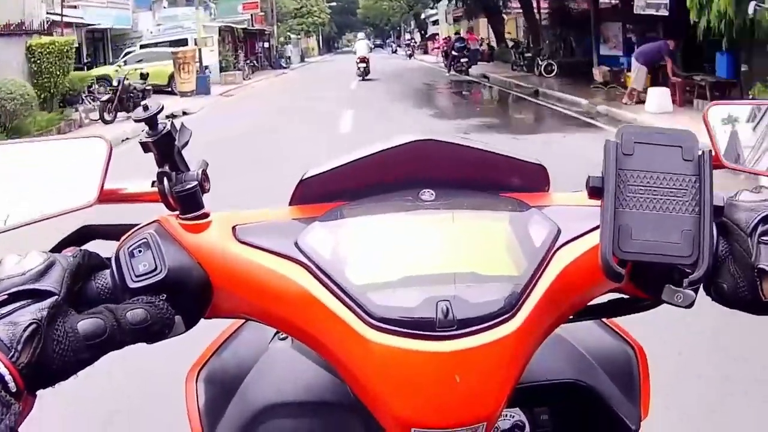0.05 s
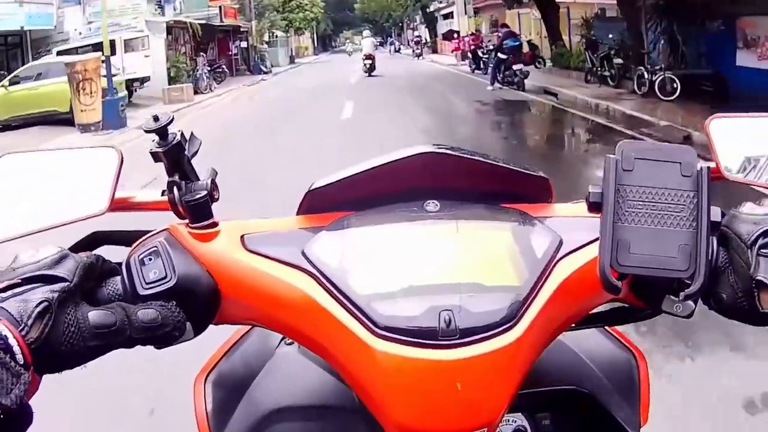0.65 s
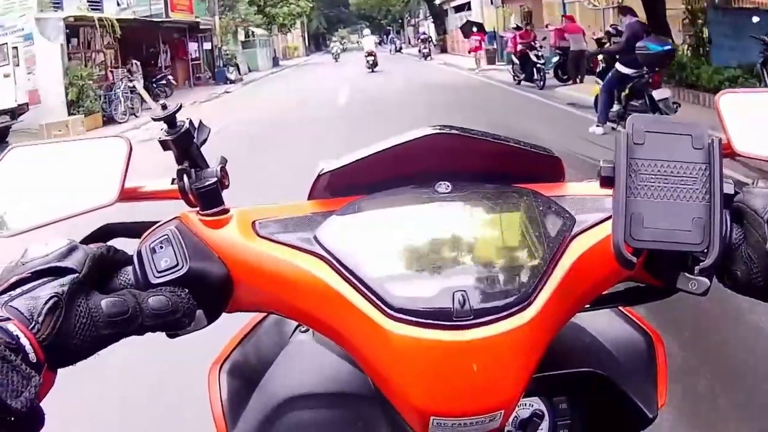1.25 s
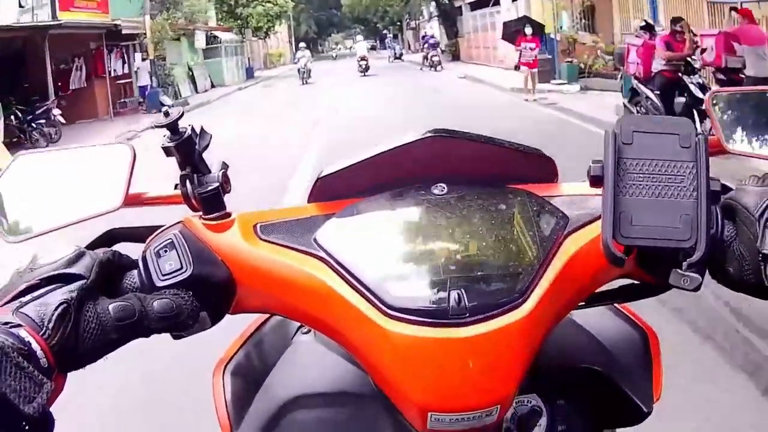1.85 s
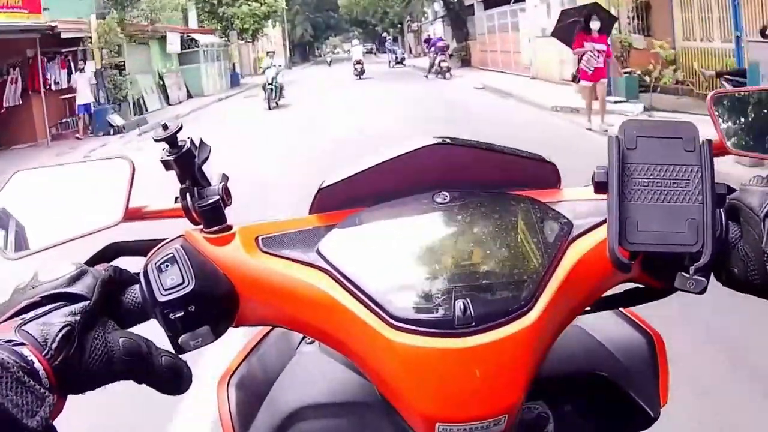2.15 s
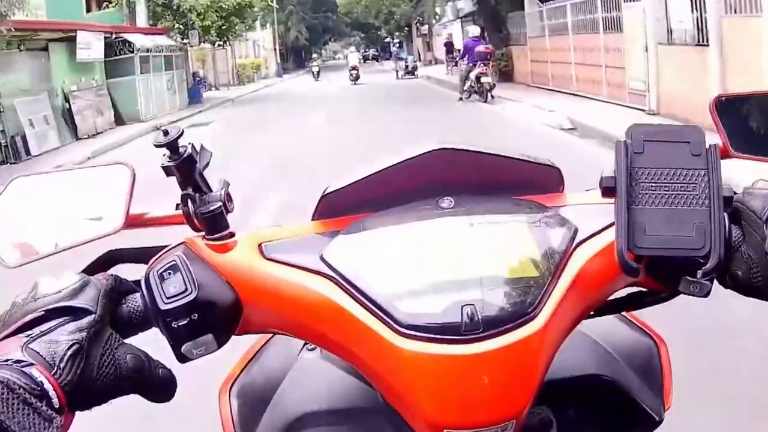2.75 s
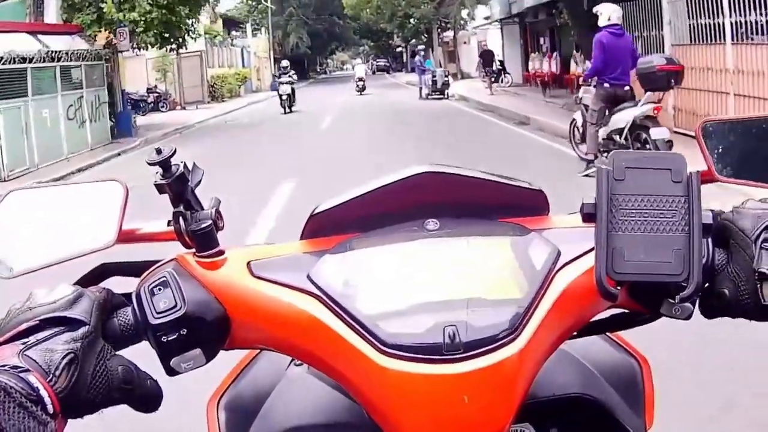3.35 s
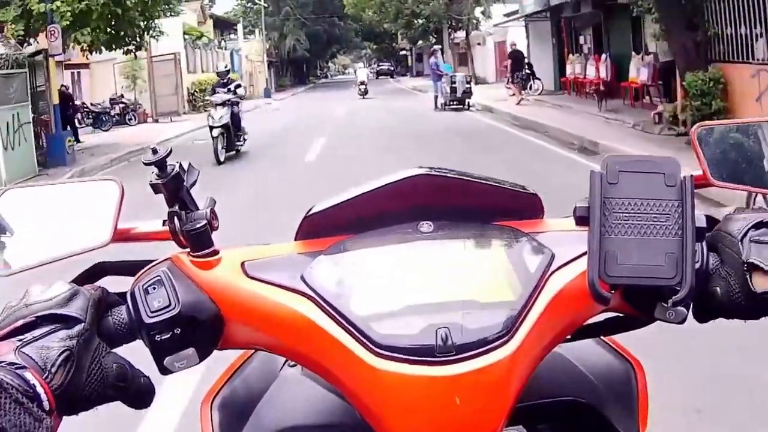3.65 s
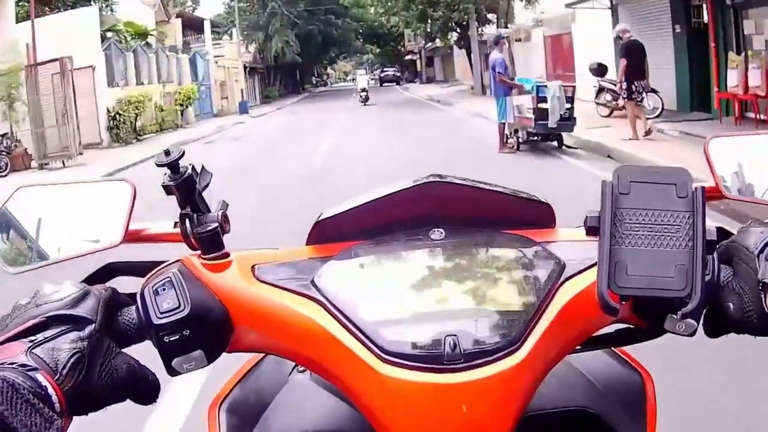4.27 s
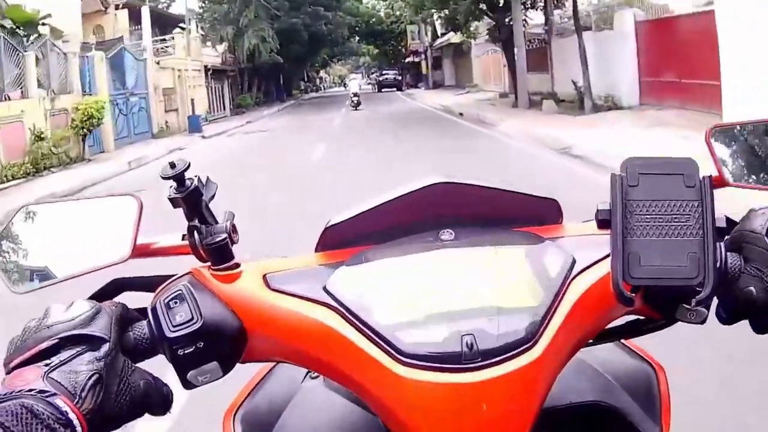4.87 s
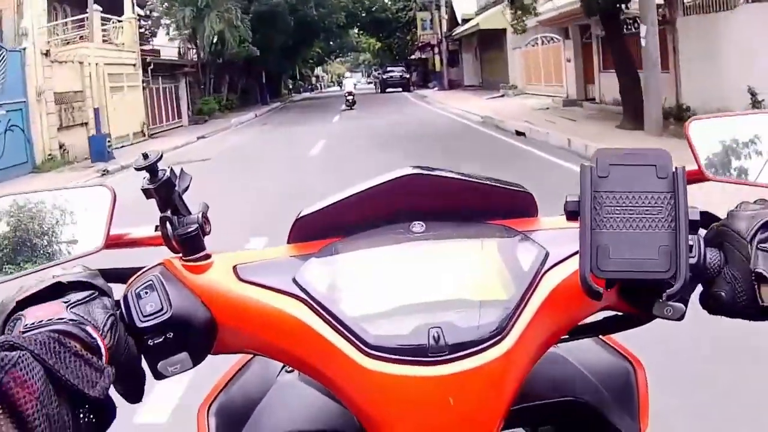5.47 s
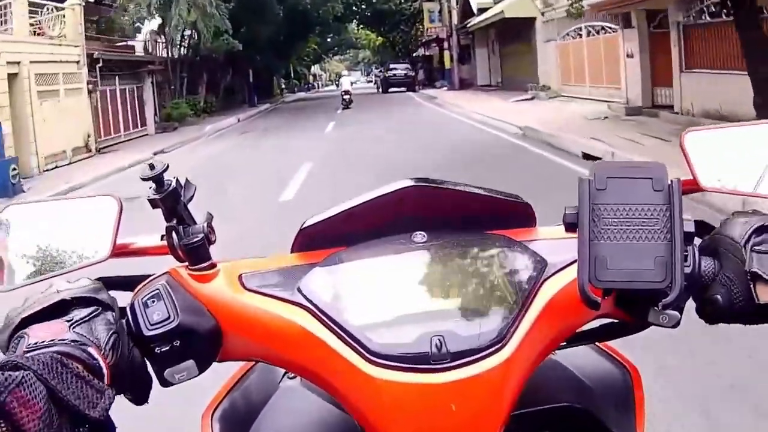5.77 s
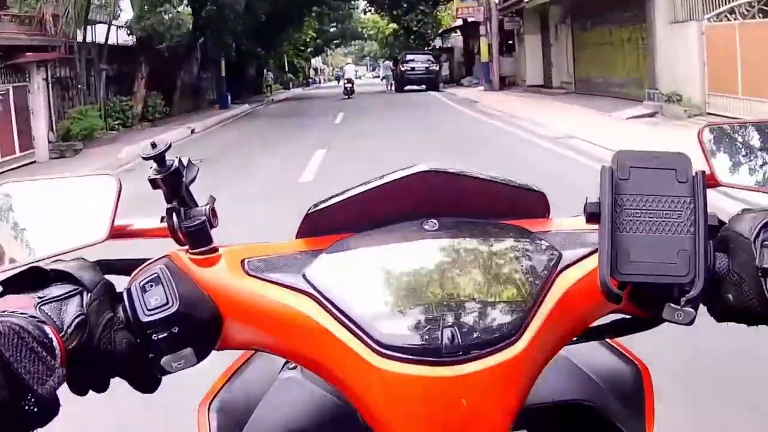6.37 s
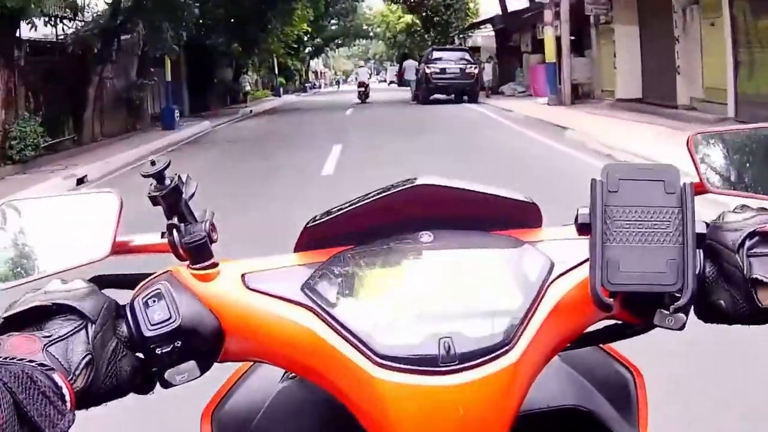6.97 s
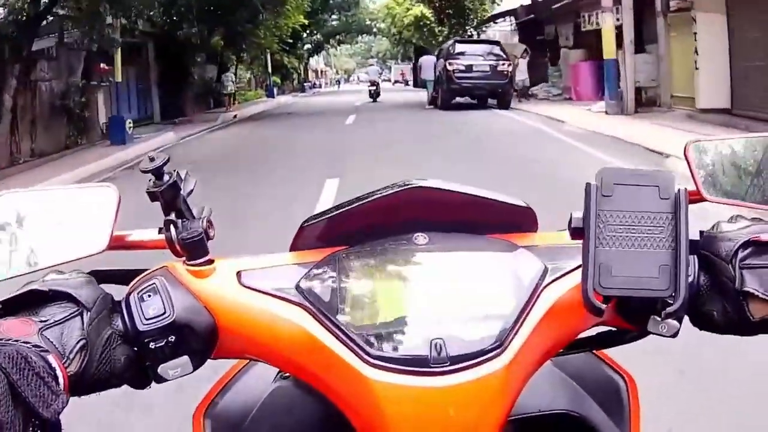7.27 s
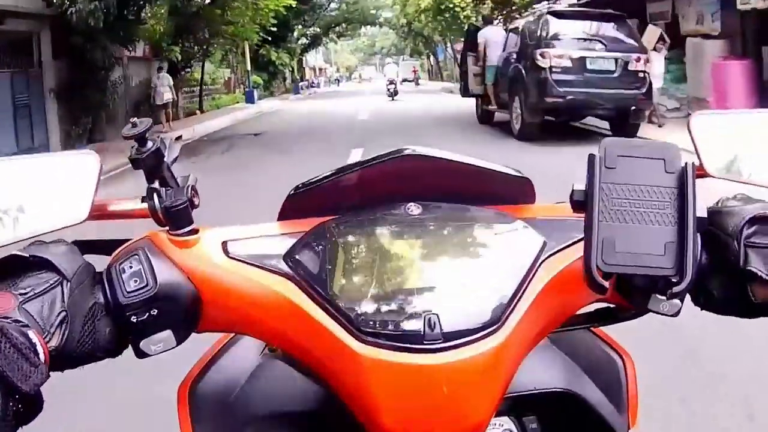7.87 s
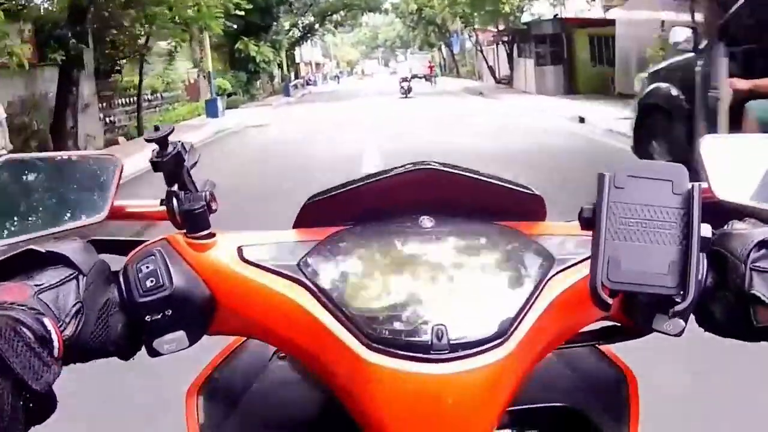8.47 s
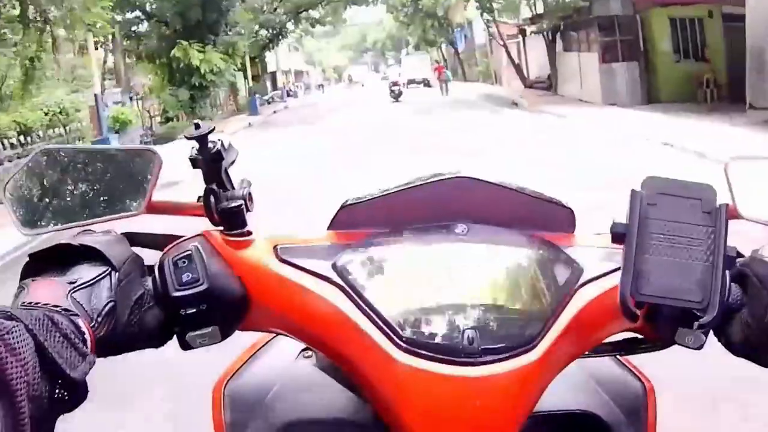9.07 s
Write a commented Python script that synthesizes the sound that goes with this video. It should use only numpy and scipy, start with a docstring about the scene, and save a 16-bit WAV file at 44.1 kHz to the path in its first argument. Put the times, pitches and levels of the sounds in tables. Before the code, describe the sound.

A small scooter engine drones and rattles along a street in rumbling wind, easing off and pulling again as two oncoming motorbikes pass.

```python
"""A street, heard from the chest of a rider on a single-cylinder scooter: it gathers speed, cruises,
is eased off twice and pulls again. The exhaust drones under load and putts when eased; the bodywork
booms, valve gear and belt clatter in step with the firings, and loose covers rattle.
Wind and tyres rumble, growing with speed. Two oncoming motorbikes pass, dropping in pitch."""
import sys
import numpy as np
from scipy import signal
from scipy.fft import rfft, irfft, next_fast_len
from scipy.io import wavfile
from scipy.ndimage import uniform_filter1d, minimum_filter1d, map_coordinates

SR = 44100
rng = np.random.default_rng(int(sys.argv[2]) if len(sys.argv) > 2 else 0)


def log_audio(samples):
    """Write samples as a 16-bit WAV file to the path given in sys.argv[1]."""
    # one column per channel
    frames = np.atleast_2d(samples).T
    # limit to full scale, then quantise
    limited = np.clip(frames, -1, 1)
    pcm = np.round(limited * 32767).astype(np.int16)
    wavfile.write(sys.argv[1], SR, pcm)


N = 406602

# Brief lulls. Each row: centre in s, half length in s, cover rattle cut in dB, belt whine cut in dB.
LULLS = [(0.201, 0.055, 9.5, -3), (0.495, 0.022, 6.5, 5), (6.326, 0.039, 8.5, 17), (7.152, 0.21, 5.5, 3.5),
         (7.417, 0.02, 12.5, 10), (8.225, .025, 13, 17)]


def amp(db):
    """Decibels to gain."""
    return 10 ** (np.asarray(db) / 20)


def unit(x):
    """Scale to rms 1."""
    return x / np.sqrt(np.mean(x ** 2) + 1e-20)


def clock():
    """Sample times in s."""
    return np.arange(N) / SR


def curve(rows):
    """Interpolate (time in s, value) rows to every sample."""
    return np.interp(clock(), *np.transpose(rows))


def wobble(knots_per_s):
    """Smooth random curve, rms near 1."""
    grid_s = np.arange(0, N + 32, 32) / SR
    knots = rng.standard_normal(int(N * knots_per_s / SR) + 4)
    return np.interp(clock(), grid_s, map_coordinates(knots, [grid_s * knots_per_s]))


def held(start_s, end_s, attack_s, release_s):
    """Gain that reaches 1 at the start, holds to the end, then decays."""
    early_s, late_s = np.maximum(start_s - clock(), 0), np.maximum(clock() - end_s, 0)
    return np.exp(-(early_s / attack_s) ** 2 - late_s / release_s)


def swell(centre_s, half_s):
    """Bell curve, peak 1."""
    return np.exp(-((clock() - centre_s) / half_s) ** 2)


def speed_gain(cycle_hz, base_db, db_per_hz):
    """Gain rising with engine speed; base_db at 22.5 cycles per s."""
    return amp(base_db + db_per_hz * (cycle_hz - 22.5))


def filtered(x, response):
    """Apply a frequency response by FFT."""
    size = next_fast_len(N + SR // 2)
    return irfft(rfft(x, size) * response(np.fft.rfftfreq(size, 1 / SR)), size)[..., :N]


def coloured(x, spectrum, modes=()):
    """Shape x by a smooth spectrum plus resonant peaks; rms 1."""
    knots_hz, knots_db = np.transpose(spectrum)
    slope_db = lambda hz: np.interp(np.log(hz + 1), np.log(knots_hz), knots_db)
    peaks_db = lambda hz: sum(db / (1 + (2 * (hz - centre) / width) ** 2) for centre, width, db in modes)
    return unit(filtered(x, lambda hz: amp(slope_db(hz) + peaks_db(hz))))


def band_noise(centre_hz, width_hz):
    """Noise in one resonance; rms 1."""
    resonance = lambda hz: 1 / (1 + 1.3j * (hz - centre_hz) / width_hz) ** 2
    return unit(filtered(rng.standard_normal(N), resonance))


def note(cycles, orders, waver_db, waver_per_s):
    """Partials locked to a shaft, each wavering in level."""
    return np.sqrt(2) * sum(
        amp(db + waver_db * wobble(waver_per_s)) * np.sin(2 * np.pi * (k * cycles + rng.random()))
        for k, db in orders)


def exhaust(cycles):
    """The pipe drones throatily under load, hums higher at cruise and barks at a throttle blip."""
    # Drone under load. Each row: time in s, level in dB.
    drone_levels = [(0, -14), (.15, -16), (.28, -23), (.48, -18.5), (.65, -23), (.95, -22), (1.2, -17),
                    (1.8, -16.5), (1.95, -19), (2.08, -27), (3, -33), (6.9, -32), (7.4, -21), (7.8, -18),
                    (8.15, -17.5), (8.8, -17.5), (9, -20.5), (9.1, -32)]
    # Partials of the four notes. Each row: multiple of the cycle rate, relative level in dB.
    drone_orders = [(3, -10), (5, -20), (7, 1), (9, -19)]
    throat_orders = [(12, -6), (14, -9), (15, -7), (17, -1), (19, -2.5), (21, -5), (24, -6), (26, -8)]
    cruise_orders = [(7, -4), (8, -9.5), (10, -5), (12, -3.5), (14, -16), (20, -15.5)]
    blip_orders = [(7, -0.5), (9, -6.5), (10, -3), (20, -12), (26, -13.5)]
    drone = note(cycles + .005 * wobble(16), drone_orders, waver_db=1.8, waver_per_s=12)
    throat = note(cycles + .0062 * wobble(30), throat_orders, waver_db=3.5, waver_per_s=12)
    cruise = note(cycles + .009 * wobble(30), cruise_orders, waver_db=3.5, waver_per_s=18)
    blip = note(cycles + .018 * wobble(35), blip_orders, waver_db=4.5, waver_per_s=25)
    cruise *= amp(-20.5) * held(3.016, 4.55, attack_s=.25, release_s=1.07)
    blip *= amp(-20) * swell(6.43, half_s=.27)
    return amp(curve(drone_levels)) * (drone + amp(-14.5) * throat) + cruise + blip


def boom(cycles):
    """The bodywork shakes in two low, wandering tones that climb with the drive."""
    # Each row: time in s, level in dB.
    levels = [(0, -27), (1.2, -23), (1.7, -17), (2.8, -11.5), (4.3, -13.5), (4.85, -16.5), (7.1, -26.5),
              (8.3, -24), (8.65, -17), (9.22, -13)]
    # Each row: multiple of the cycle rate, relative level in dB.
    orders = [(1.62, -1.5), (3.47, -2.5)]
    drift_cycles = np.cumsum(2.6 * wobble(25)) / SR
    return amp(curve(levels)) * note(cycles + drift_cycles, orders, waver_db=3, waver_per_s=24)


def firing_beat(firings):
    """Log-gain ripple at once and twice the firing rate."""
    return .037 * np.cos(2 * np.pi * firings) + .2 * np.cos(4 * np.pi * firings)


def casing(firings, cycle_hz, mesh_share=.22):
    """Valve gear and belt repeat small impacts each firing; the casing whirs and the belt whines."""
    # Each row: frequency in Hz, relative level in dB.
    spectrum = [(400, -24.5), (750, -2.5), (1000, 1), (1400, 3), (1700, -4.5), (2100, -12), (2750, -7),
                (3600, -46.5), (6000, -77), (12000, -51)]
    # Casing resonances. Each row: centre in Hz, width in Hz, boost in dB.
    modes = [(1180, 60, 3.5), (1294, 48, 9), (1430, 100, 4.5), (1700, 50, 2.5), (1870, 70, 6),
             (2490, 190, 6.5), (2930, 110, 4.5)]
    impacts = rng.standard_normal(SR // 50)
    phase = (firings + .0044 * wobble(30)) % 1
    mesh = unit(np.interp(phase, np.linspace(0, 1, len(impacts)), impacts))
    drive = np.sqrt(mesh_share) * mesh + np.sqrt(1 - mesh_share) * rng.standard_normal(N)
    beat = firing_beat(firings)
    whir = coloured(np.exp(.37 * beat) * drive, spectrum, modes)
    whine_hz = 2505 + 18 * wobble(14)
    whine_tone = np.sin(2 * np.pi * np.cumsum(whine_hz) / SR)
    whine = unit(np.exp(beat) * band_noise(0, width_hz=105) * whine_tone)
    lull_db = sum(db * swell(s, half_s) for s, half_s, _, db in LULLS)
    return speed_gain(cycle_hz, base_db=-37, db_per_hz=.29) * (whir + amp(-9.7 - lull_db) * whine)


def covers(firings, cycle_hz, eased):
    """Covers rattle in uneven bursts, shaken by firings, putts and bumps; the drive case rings."""
    # Cover and drive case resonances. Each row: centre in Hz, width in Hz, relative level in dB.
    cover_modes = [(3315, 160, -14), (4400, 480, -8), (5700, 270, -12), (6110, 160, -15), (6604, 110, -7.5),
                   (6925, 330, -3.5), (7330, 490, -8.5)]
    ring_modes = [(4345, 90, -11.5), (5780, 110, -19)]
    # Each row: frequency in Hz, relative level in dB.
    rasp_spectrum = [(1500, -19.5), (3000, 1), (4200, -5), (5100, -1.5), (6200, -4), (7800, 3.5),
                     (8700, -6), (10000, -12.5), (12500, -24), (15500, -19.5)]
    # Road bumps. Each row: time in s, gain in dB.
    bumps = [(.251, -46), (.87, -47), (1.461, -45), (1.64, -47), (2.173, -44), (5.511, -43.5), (5.914, -44),
             (6.14, -47), (6.22, -47), (6.265, -45.5), (6.441, -47), (7.55, -45), (7.655, -41.5),
             (8.045, -42), (8.354, -39.5)]
    knock = .25 * eased / eased.max() * (np.cos(2 * np.pi * firings) - .5)
    bursts_db = 4.6 * np.tanh(wobble(100)) + 2.3 * np.tanh(wobble(32)) - 1.5
    shake = np.exp(firing_beat(firings) + knock) * amp(bursts_db)
    rattle = sum(amp(db + 2.9 * wobble(90)) * band_noise(hz, width) for hz, width, db in cover_modes)
    rasp = amp(-6.5) * coloured(rng.standard_normal(N), rasp_spectrum)
    ring = sum(amp(db) * band_noise(hz, width) for hz, width, db in ring_modes)
    rough_road_db = 2.5 * np.clip((clock() - 8.35) / .03, 0, 1)
    lull_db = sum(db * swell(s, half_s) for s, half_s, db, _ in LULLS)
    gain = speed_gain(cycle_hz, base_db=-45, db_per_hz=.082) * amp(rough_road_db - lull_db)
    jolts = sum(amp(db) * held(s, s + .006, attack_s=.006, release_s=.014) for s, db in bumps)
    return gain * (shake * rattle + shake ** .75 * rasp + ring) + jolts * (rattle + rasp)


def wind(cycle_hz):
    """Gusts buffet the rider, harder with speed."""
    # Each row: frequency in Hz, relative level in dB.
    spectrum = [(10, 2), (25, 2), (50, -4), (70, 3.5), (95, -4.5), (125, -6.5), (190, -6), (300, -22.5),
                (600, -69)]
    gusts = amp(.25 * wobble(12)) * rng.standard_normal(N)
    return speed_gain(cycle_hz, base_db=-14, db_per_hz=.17) * coloured(gusts, spectrum)


def street_echoes(x):
    """Road and passing walls return x in shifting echoes of steady total power; rms 1."""
    fade = np.linspace(1, 0, num=900)
    shares = np.array([wobble(4) for _ in range(8)])
    shares /= np.linalg.norm(shares, axis=0)
    echoes = [signal.oaconvolve(x, fade * rng.standard_normal(len(fade)))[:N] for _ in shares]
    return unit(np.sum(shares * echoes, axis=0))


def road_roar(firings, cycle_hz):
    """Tyre roar and echoed exhaust buzz throb with the firings and resonate in the bodywork."""
    # Each row: frequency in Hz, relative level in dB.
    spectrum = [(100, -10.5), (200, 4), (320, 4), (400, 0), (500, -4), (590, -7), (680, -15), (900, -26.5),
                (1500, -29.5), (4000, -62.5)]
    # Bodywork resonances. Each row: centre in Hz, width in Hz, boost in dB.
    modes = [(212, 25, 2), (465, 24, 2), (545, 24, 3), (586, 24, 2)]
    pulses = np.diff(np.floor(firings), prepend=0) * amp(3 * rng.standard_normal(N))
    buzz = amp(-3) * street_echoes(pulses - pulses.mean())
    throb = 1 + .25 * np.cos(2 * np.pi * firings)
    tyres = amp(1.2 * wobble(25)) * rng.standard_normal(N)
    roar = coloured(throb * (buzz + tyres), spectrum, modes)
    return speed_gain(cycle_hz, base_db=-21, db_per_hz=.32) * roar


def hiss_and_growl(cycle_hz):
    """Air hisses with speed; in swells the hiss rises and the tyres growl."""
    # Each row: centre in s, half length in s, hiss in dB, growl in dB.
    swells = [(2.131, .13, -56, -23), (2.442, 0.25, -39.5, -18), (2.864, 0.15, -47, -43),
              (8.757, 0.8, -49.5, -26)]
    # Each row: frequency in Hz, relative level in dB.
    hiss_spectrum = [(700, 11), (1500, -7.5), (2200, -3), (4400, 6), (5500, -2.5), (7600, 13), (9500, -7),
                     (12000, -16), (15000, -13)]
    growl_spectrum = [(150, -16.5), (300, 0.5), (400, 3), (500, -7.5), (700, -12), (1000, -21.5),
                      (1400, -21), (2200, -42), (6000, -92.5)]
    hiss_gain = speed_gain(cycle_hz, base_db=-53.5, db_per_hz=1.2)
    hiss_gain += sum(amp(db) * swell(s, half_s) for s, half_s, db, _ in swells)
    growl_gain = sum(amp(db) * swell(s, half_s) for s, half_s, _, db in swells)
    hiss = hiss_gain * coloured(rng.standard_normal(N), hiss_spectrum)
    return hiss + growl_gain * coloured(rng.standard_normal(N), growl_spectrum)


def eddies():
    """Faint air noise, independent left and right."""
    # Each row: frequency in Hz, relative level in dB.
    spectrum = [(300, 5.5), (1000, -6), (3000, -17), (7000, -21.5), (10000, -22.5), (15000, -33.5)]
    return amp(-51) * coloured(rng.standard_normal((2, N)), spectrum)


def howls():
    """Drive resonances sing out for a while, slightly unsteady in pitch."""
    # Each row: start in s, end in s, nominal pitch in Hz, its glide in Hz per s, level in dB.
    events = [(.056, .35, 1298, 0, -41), (.05, .6, 590, 0, -36), (.3, 1.3, 212, 0, -28),
              (.331, 1.7, 461, 3, -33), (1.68, 1.95, 208, 0, -25), (1.907, 2.1, 591, 17, -34),
              (2.4, 3.0, 1410, 30, -45), (4.5, 5.2, 1452, 0, -48), (5.8, 6.0, 589, -4, -30.5),
              (6.526, 6.9, 563, 45, -29.5), (7.28, 8.85, 202, 0, -24), (8.517, 8.65, 1297, 0, -37)]
    sound = np.zeros(N)
    for start_s, end_s, hz, hz_per_s, db in events:
        nominal_hz = hz + hz_per_s * (np.clip(clock(), start_s, end_s) - start_s) + 3.5 * wobble(40)
        tone = note(np.cumsum(nominal_hz) / SR, [(.99, db)], waver_db=2.5, waver_per_s=23)
        sound += held(start_s, end_s, attack_s=.06, release_s=.06) * tone
    return sound


def easing():
    """Putt gain: rises whenever the throttle is eased."""
    # Each row: start in s, end in s, level in dB.
    spans = [(0.298, .8, -18), (5.664, 6.119, -11), (6.601, 7.27, -8.5)]
    return sum(amp(db) * held(start, end, attack_s=.11, release_s=.15) for start, end, db in spans)


def putting(firings, eased, pipe_band_hz=(46, 139.8)):
    """Throttle eased: each firing is a low putt with a chuff of gas, pushing and pulling in turn."""
    count = np.floor(firings + .014 * wobble(40))
    kicks = np.diff(count, prepend=count[0]) * np.cos(np.pi * count)
    kicks *= amp(.81 * rng.standard_normal(N))
    pipe = signal.butter(3, pipe_band_hz, "band", fs=SR, output="sos")
    putts = unit(signal.sosfilt(pipe, kicks))
    chuffs = amp(-25.5) * unit(putts ** 2 * band_noise(470, width_hz=300))
    return eased * (putts + chuffs)


def oncoming_bikes(gap_m=6, pipe_boost_db=12, pipe_width_hz=42):
    """Each pipe booms mostly backwards, Doppler-shifted; rush goes forwards, clatter is heard close by."""
    # Each row: closest time in s, closing speed in m/s, firing rate in Hz, pipe resonance in Hz,
    # note start in s, note end in s, note in dB, rush in dB, clatter in dB.
    bikes = [(2.5, 13, 40.3, 190, 2.22, 2.74, -17.5, -27.5, -43),
             (3.8, 17, 48.4, 262, 3.2, 3.96, -15, -21.5, -49)]
    # Exhaust partials. Each row: multiple of the firing rate, relative level in dB.
    orders = [(4, -12.5), (5, -8.5), (6, -11.5), (7, -12), (9, -14), (10, -16.5), (11, -18), (12, -20)]
    # Each row: frequency in Hz, relative level in dB.
    rush_spectrum = [(150, -16), (300, 3.5), (600, -6.5), (900, -13), (1600, -23), (3200, -31.5),
                     (6000, -49), (10000, -56.5)]
    sound = np.zeros(N)
    for pass_s, m_per_s, firing_hz, pipe_hz, start_s, end_s, note_db, rush_db, clatter_db in bikes:
        ahead_m = m_per_s * (pass_s - clock())
        distance_m = np.hypot(gap_m, ahead_m)
        emitted_s = clock() - np.hypot(gap_m / 4, ahead_m) / 343
        nearness = gap_m / distance_m * np.exp(-distance_m / 45)
        facing = ahead_m / distance_m
        firings = firing_hz * emitted_s + .015 * wobble(30)
        piped = [(k, db + pipe_boost_db * np.exp(-((k * firing_hz - pipe_hz) / pipe_width_hz) ** 2))
                 for k, db in orders]
        engine = amp(note_db) * note(firings, piped, waver_db=2, waver_per_s=15)
        engine *= held(start_s, end_s, attack_s=.2, release_s=.06)
        engine *= np.sqrt(nearness) * (1 - .25 * facing)
        rush = amp(rush_db) * coloured(rng.standard_normal(N), rush_spectrum)
        rush *= nearness * (1 + .54 * facing)
        knocks = np.exp(.2 * np.cos(4 * np.pi * firings) + .4 * wobble(120))
        clatter = amp(clatter_db) * unit(knocks * band_noise(3800, width_hz=2900))
        sound += engine + rush + clatter * swell(pass_s, half_s=.092)
    return sound


def ticks(t60_s=.089):
    """The road jolts loose fittings into small bright clicks."""
    # Each row: start in s, onset level in dB.
    hits = [(6.3527, -36.5), (6.55, -43), (7.38, -35), (8.151, -46.5)]
    spectrum_hz_db = [(4000, -30.5), (7800, 15), (10000, -15.5), (15000, -2)]
    envelope = sum(amp(db - 60 * np.abs(clock() - s) / t60_s) * (clock() >= s) for s, db in hits)
    return envelope * coloured(rng.standard_normal(N), spectrum_hz_db)


def scene():
    """Engine speed drives the scooter's layers; all is mono but the eddies."""
    # Each row: time in s, engine speed in cycles per s (two firings a cycle).
    speeds = [(0, 19.6), (.48, 21.4), (.9, 21), (1.5, 22.6), (1.95, 22.8), (2.8, 24.7), (3.5, 25.3),
              (4.7, 25.4), (5.35, 24.6), (5.62, 26.2), (5.8, 24.1), (6.18, 21.3), (6.48, 23.8),
              (6.75, 21.4), (7, 20.2), (7.3, 19.8), (8.1, 22.6), (8.6, 23), (9.22, 24.5)]
    cycle_hz = curve(speeds)
    cycles = np.cumsum(cycle_hz * (1 + .004 * wobble(18))) / SR
    firings = 2 * cycles
    eased = easing()
    scooter = exhaust(cycles) + putting(firings, eased) + howls() + boom(cycles)
    scooter += casing(firings, cycle_hz) + covers(firings, cycle_hz, eased) + ticks()
    air_and_road = wind(cycle_hz) + road_roar(firings, cycle_hz) + hiss_and_growl(cycle_hz)
    return scooter + air_and_road + oncoming_bikes() + eddies()


def record(dry, gain_db=2.0, turn_rad=.67, top_hz=15750):
    """Turn the channels apart in phase, limit the peaks, cut the top."""
    phase_rad = np.array([[turn_rad], [-turn_rad]])
    wide = amp(gain_db) * filtered(dry, lambda hz: np.exp(1j * phase_rad))
    needed_gain = 1 / np.maximum(1, np.abs(wide).max(axis=0))
    limiter_gain = uniform_filter1d(minimum_filter1d(needed_gain, size=120), size=120)
    return filtered(wide * limiter_gain, lambda hz: hz < top_hz)


dry = scene()
out = record(dry)
log_audio(out)
```